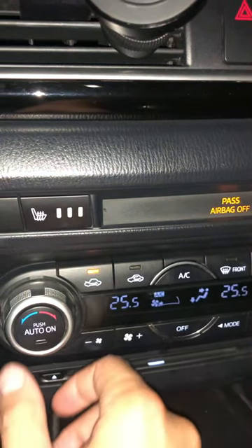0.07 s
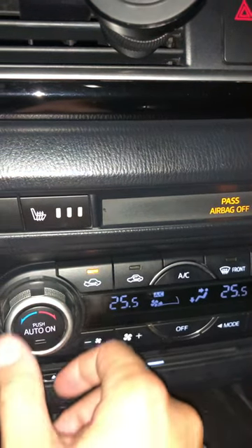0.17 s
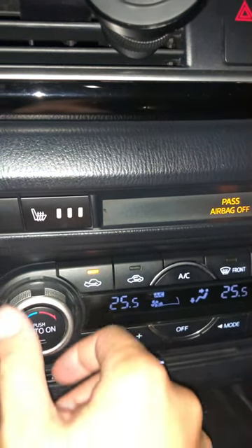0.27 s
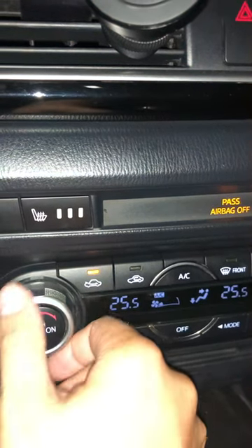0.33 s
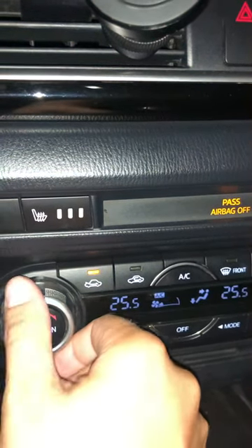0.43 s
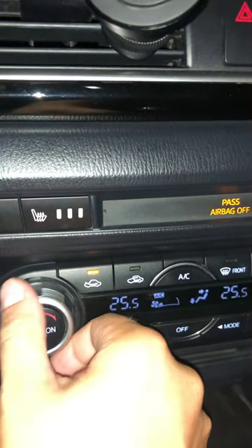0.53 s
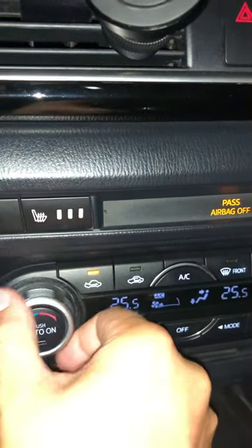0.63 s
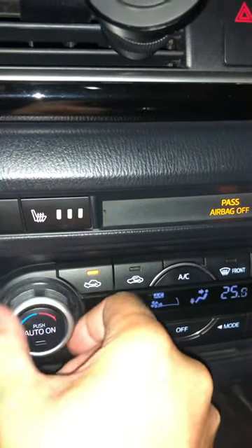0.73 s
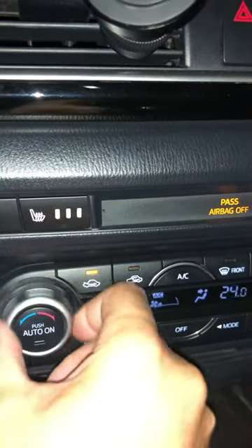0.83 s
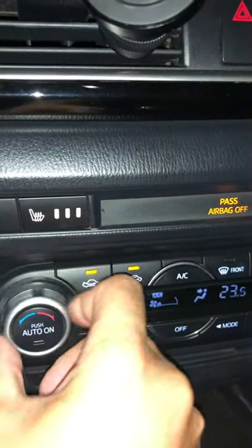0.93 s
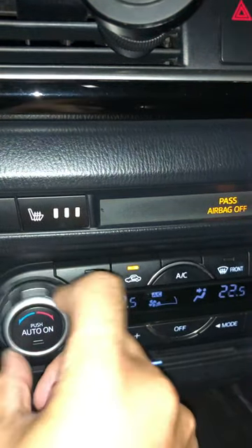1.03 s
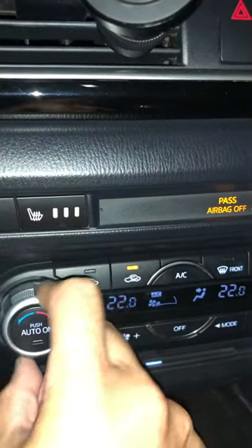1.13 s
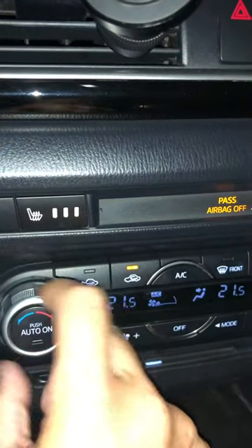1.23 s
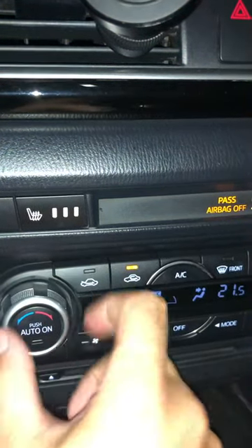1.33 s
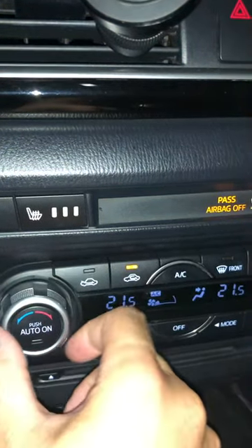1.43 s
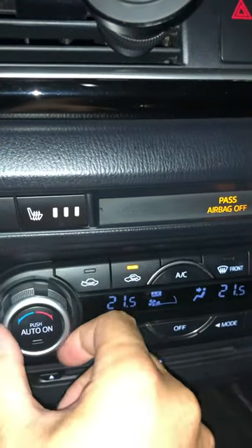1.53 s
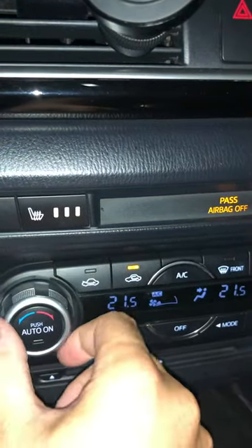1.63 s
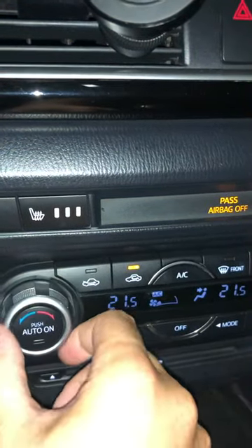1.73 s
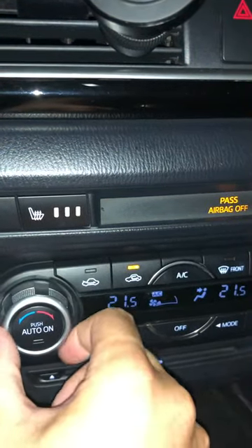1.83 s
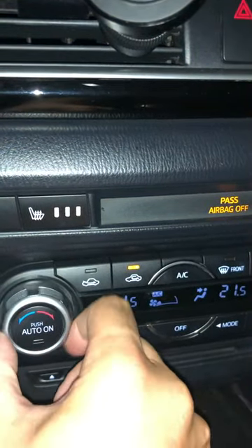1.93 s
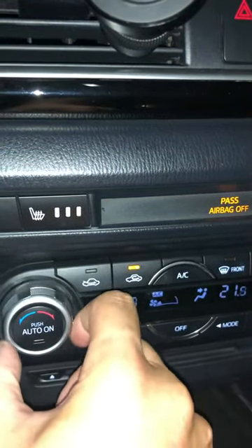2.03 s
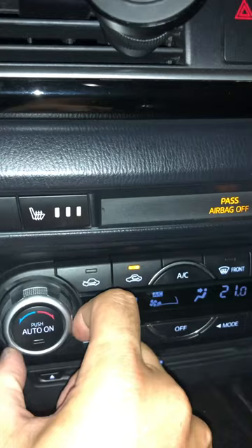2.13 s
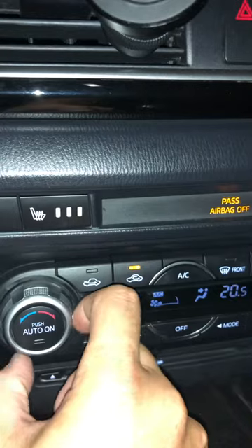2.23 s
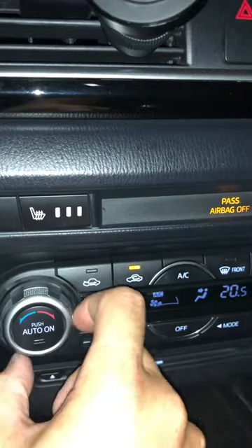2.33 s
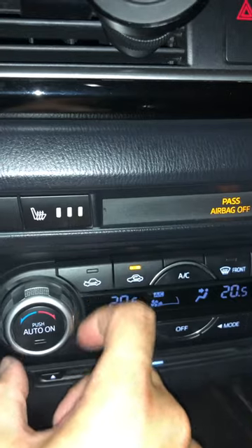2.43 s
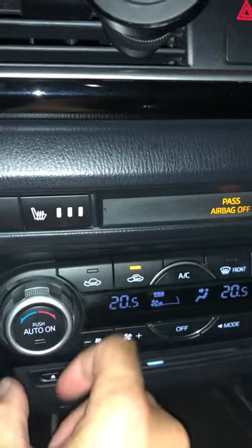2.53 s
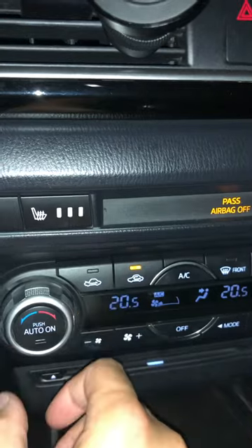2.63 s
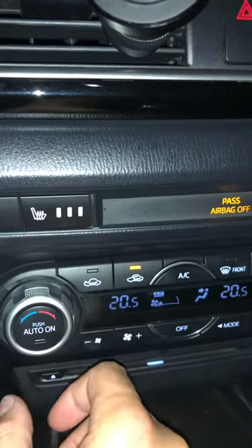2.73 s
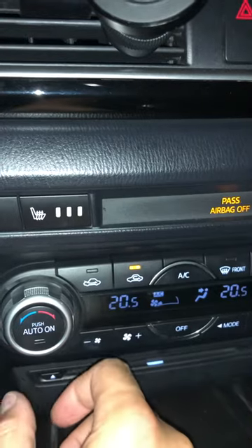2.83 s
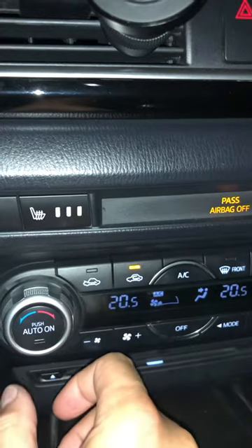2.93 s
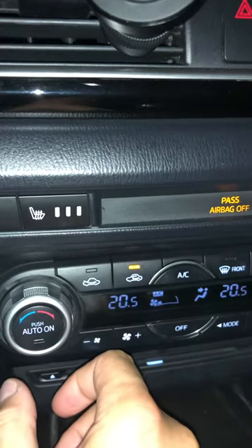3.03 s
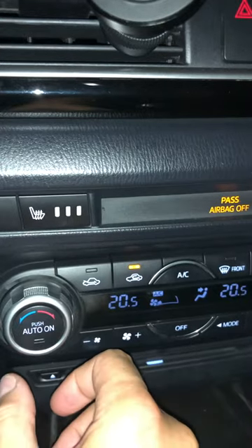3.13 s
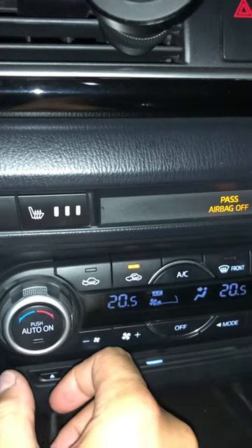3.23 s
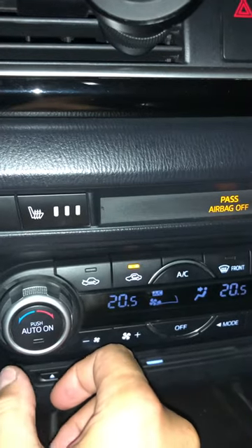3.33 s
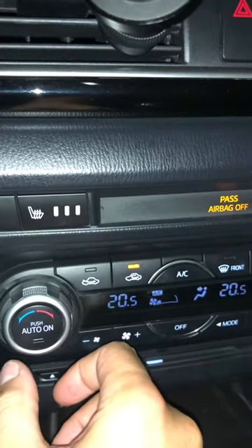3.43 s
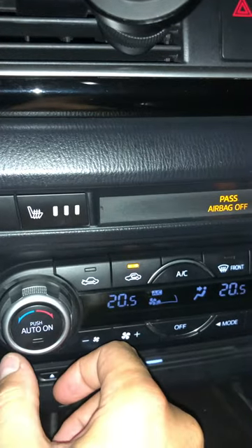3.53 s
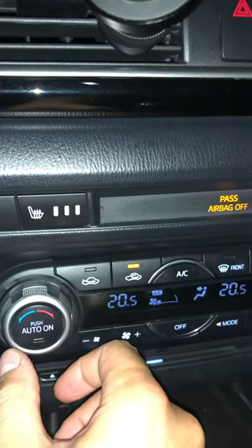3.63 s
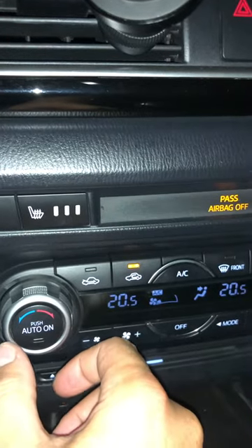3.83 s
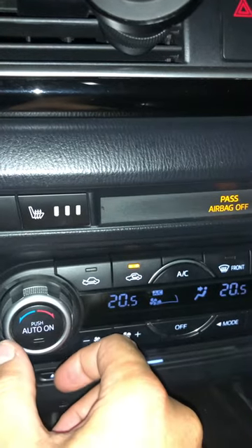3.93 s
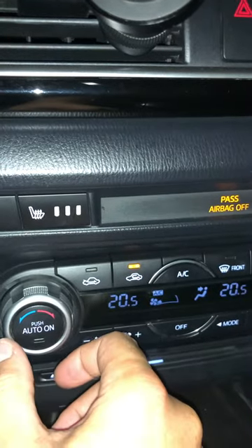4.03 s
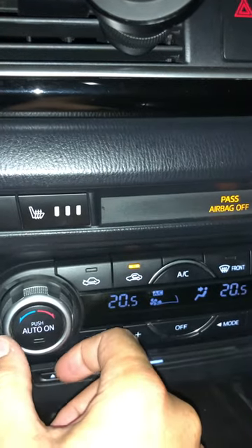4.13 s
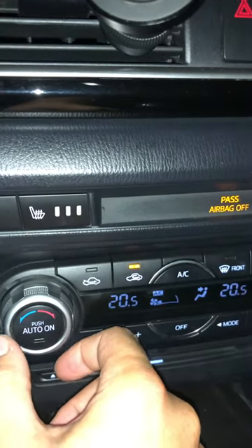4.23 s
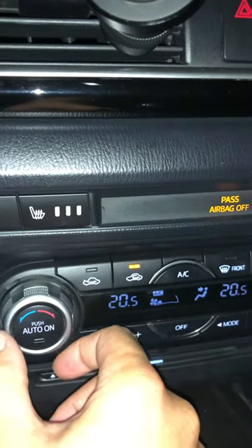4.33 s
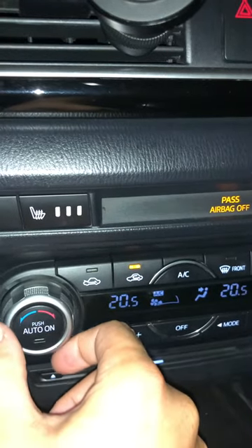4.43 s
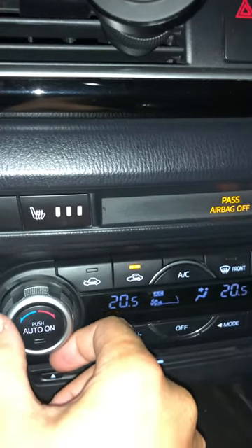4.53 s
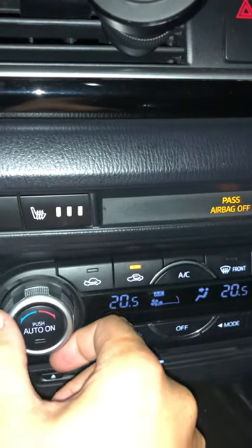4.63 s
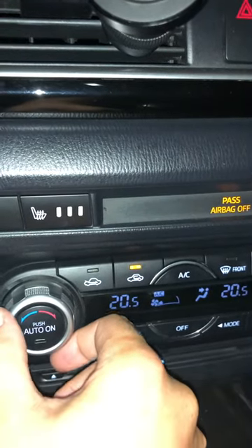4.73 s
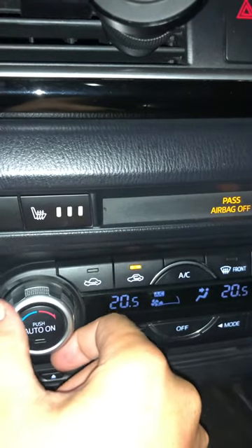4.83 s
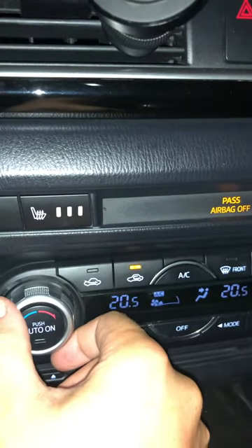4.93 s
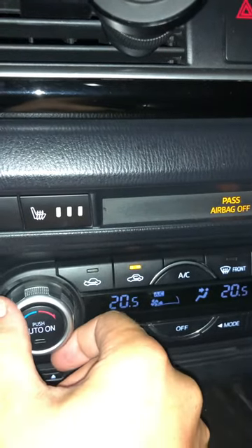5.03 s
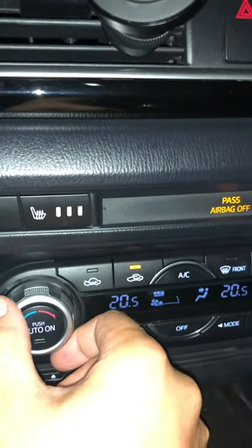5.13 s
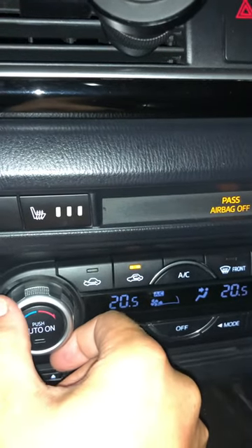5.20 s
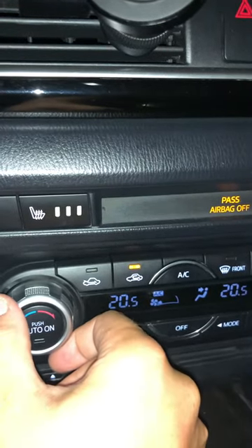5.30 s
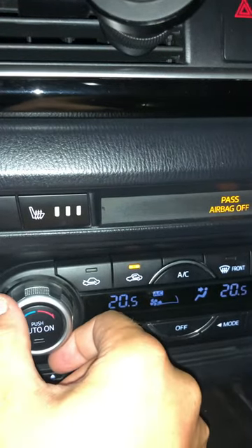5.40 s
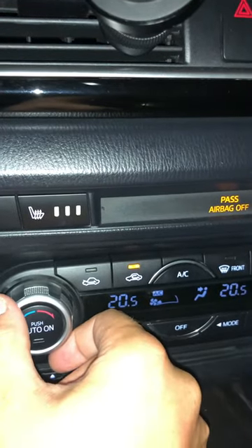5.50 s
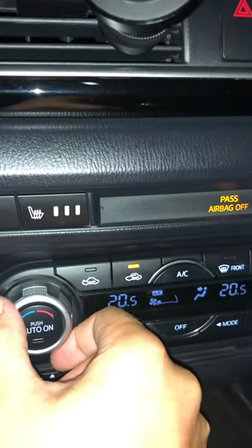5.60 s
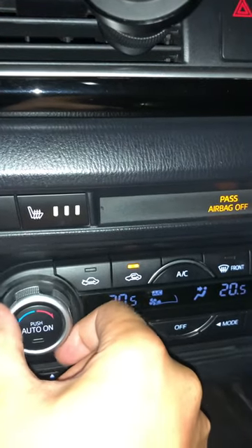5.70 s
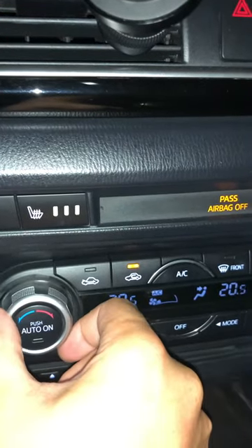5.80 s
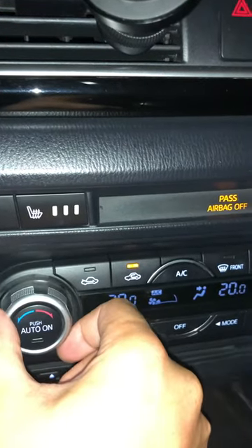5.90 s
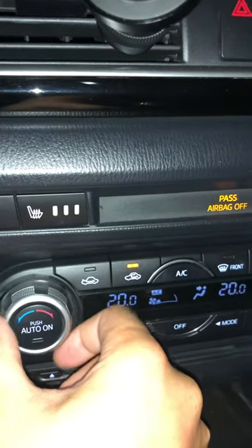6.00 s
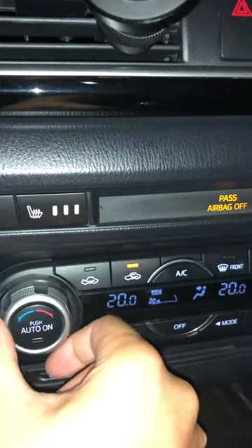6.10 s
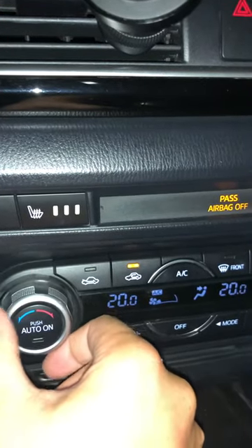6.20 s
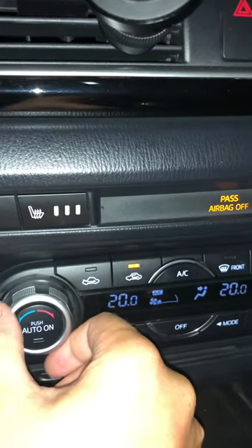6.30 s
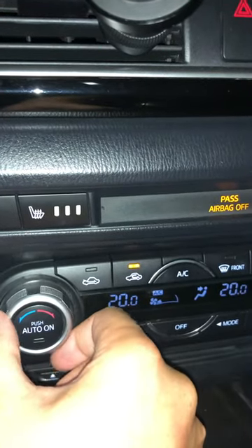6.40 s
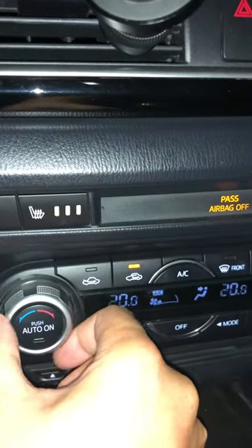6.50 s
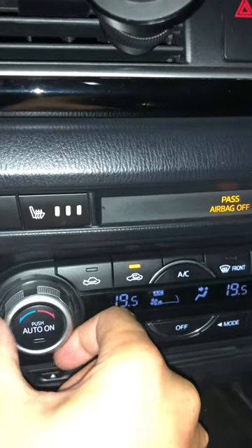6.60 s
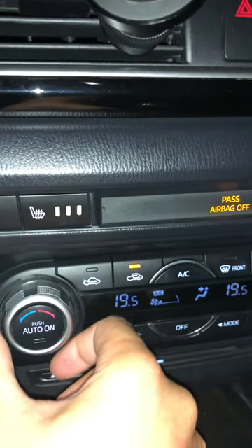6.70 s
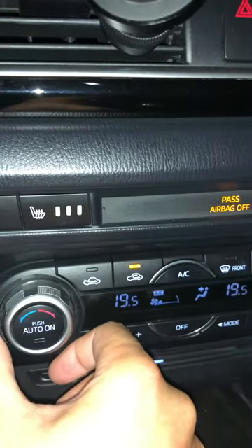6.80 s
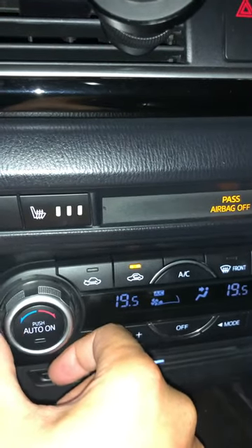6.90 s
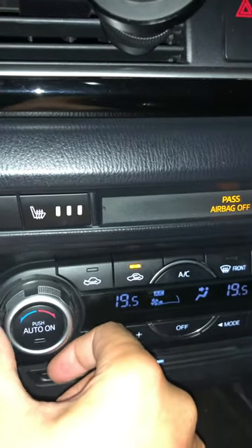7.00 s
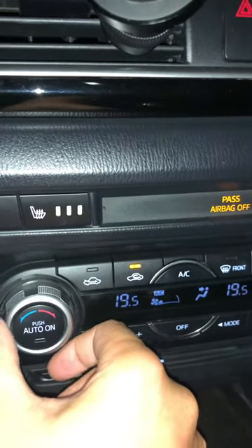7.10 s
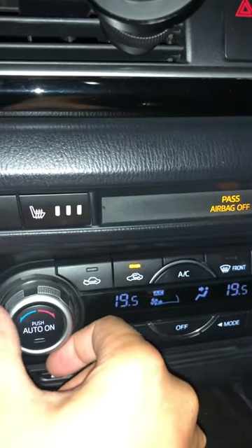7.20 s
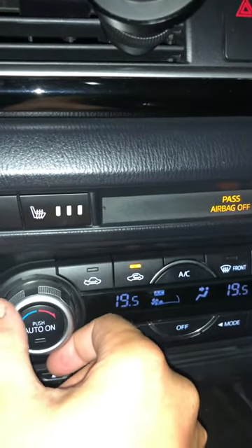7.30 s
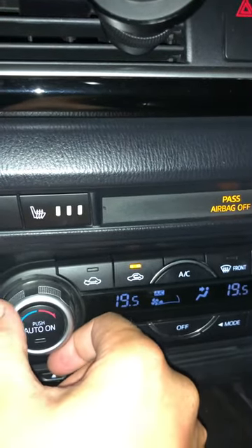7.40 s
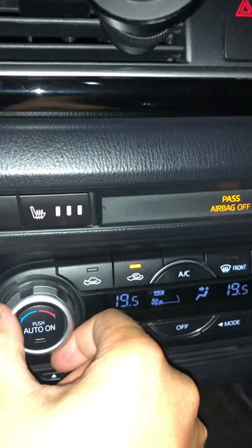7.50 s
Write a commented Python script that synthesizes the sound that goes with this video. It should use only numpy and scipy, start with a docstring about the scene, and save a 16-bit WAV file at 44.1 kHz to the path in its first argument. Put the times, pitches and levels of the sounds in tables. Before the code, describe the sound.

In the tight, dry cabin of a parked car, a low idling engine hum, steady soft blower air and bassy, gliding traffic drone run throughout, captured by a small nearby microphone. Faint dull console bumps come at 0.1 and 0.25 seconds. From about 0.55 to 1.1 seconds a knob turns through nine quick, crisp plastic clicks, roughly 0.07 seconds apart, each a bright spring tick with a short hollow panel knock; damped thuds from the hand mingle with them. Two more clicks fall at 1.95 and 2.1, with a barely audible finger brush near 2.45. Then mostly hum and air, with a very faint bump around 3.35. A light brush at 5.55 precedes a single click at 5.75; another click comes at 6.45, then a tiny brush at 6.65. Outside, the low drone swells and sinks in pitch toward the end at 7.5.

```python
"""An idling engine, a steady blower and dull traffic outside, heard inside a parked car; then a dial is turned.
The engine is a sum of shaft orders, the blower duct-coloured noise, the traffic gliding tones over rumble.
A hand bumps the console (damped thuds) and brushes the climate knob (noise puffs).
Each detent snaps a spring into a notch and rings the plastic panel; the small cabin answers at once."""
import sys
import numpy as np
from scipy import signal
from scipy.fft import rfft, irfft, next_fast_len
from scipy.io import wavfile
from scipy.ndimage import uniform_filter1d, map_coordinates

SR = 44100
rng = np.random.default_rng(int(sys.argv[2]) if len(sys.argv) > 2 else 0)


def wav_out(sig):
    """Save sig, one row per channel (or a flat mono array), as 16-bit PCM at SR to the path in sys.argv[1]."""
    wavfile.write(sys.argv[1], SR, np.round(np.clip(np.atleast_2d(sig).T, -1, 1) * 32767).astype(np.int16))


N = 332955


def amp(db):
    """Gain of a level in dB."""
    return 10 ** (np.asarray(db) / 20)


def unit(x):
    """x at rms 1."""
    return x / np.sqrt(np.mean(x ** 2) + 1e-20)


def along(points, hz):
    """Interpolate (Hz, value) points on a log frequency axis."""
    point_hz, values = np.transpose(points)
    return np.interp(np.log(hz + 1), np.log(point_hz + 1), values)


def curves(rows):
    """One value per sample for each column after the time in seconds."""
    time_s, *columns = np.transpose(rows)
    return [np.interp(np.arange(N) / SR, time_s, column) for column in columns]


def wobble(rate_hz):
    """A smooth random curve through normal knots, rate_hz of them a second."""
    knots = rng.standard_normal(int(N * rate_hz / SR) + 4)
    return map_coordinates(knots, [np.arange(N) * rate_hz / SR])


def filtered(x, response):
    """x through a zero-phase response, given as gain against Hz."""
    size = next_fast_len(len(x) + 8192)
    spectrum = rfft(x, size) * response(np.fft.rfftfreq(size, 1 / SR))
    return irfft(spectrum, size)[:len(x)]


def rush(colour_db, patchy_db):
    """Turbulence: coloured noise of rms 1 with time-frequency patches of random gain."""
    z = signal.stft(rng.standard_normal(N + 512), nperseg=512)[2]
    field = uniform_filter1d(rng.standard_normal(z.shape), size=5, axis=0)  # across frequency
    field = uniform_filter1d(field, size=12, axis=1)  # across time
    noise = signal.istft(z * amp(patchy_db * unit(field)), nperseg=512)[1][:N]
    return unit(filtered(noise, lambda hz: amp(colour_db(hz))))


def ring(modes, t, spread_db, rise_s):
    """Struck modes decay; neighbours have opposite signs, each strike new random strengths."""
    chance = rng.standard_normal(len(modes))
    total = 0
    for k, (hz, db, t60_s) in enumerate(modes):
        envelope = amp(db + spread_db * chance[k] - 60 * t / t60_s)
        total = total + (-1) ** (k + 1) * envelope * np.sin(2 * np.pi * hz * t)
    return (1 - np.exp(-t / rise_s)) * total


def engine():
    """The idling engine comes through the mounts as shaft orders that waver in strength."""
    # Each row: time in seconds, shaft turns per second, order gain in dB, fourth-order boom in dB.
    idle = [(0, 11.74, -50, -44.5), (1.5, 11.78, -55, -44.5), (2.25, 11.75, -56, -53),
            (3.75, 11.77, -53, -53), (5.25, 11.82, -55, -53), (6.4, 11.98, -63, -59),
            (7.55, 12.02, -63, -60)]
    # Each row: multiple of the shaft rate, relative level in dB.
    shaft_orders = [(2, 1), (6, 5.5), (8, -12), (10, -2), (11, -5), (12, -0.5), (22, -12.5), (24, -15.5),
                    (26, -13)]
    turns_hz, db, boom_db = curves(idle)
    angle = 2 * np.pi * np.cumsum(turns_hz * (1 + 0.0015 * wobble(2.88))) / SR
    orders = 0
    for k, level_db in shaft_orders:
        phase = rng.uniform(0, 2 * np.pi)
        orders = orders + amp(level_db + 2.5 * wobble(5)) * np.sin(k * angle + phase)
    boom = amp(boom_db + 0.53 * wobble(2.4)) * np.sin(4 * angle)
    return amp(db) * orders + boom


def blower():
    """Air rushes through the ducts, which lift a few bands."""
    # Each row: time in seconds, rms level in dB.
    air = [(0, -52), (0.9, -51), (1.4, -53), (6, -53), (7.55, -54)]
    # Noise colour. Each row: frequency in Hz, relative density in dB per Hz.
    air_colour = [(88, -33.5), (150, -13), (168, -9.5), (204, -13), (273, -7.5), (409, -13), (495, -8.5),
                  (687, -14.5), (850, -13), (1180, -20.5), (1320, -27), (1510, -26), (1950, -30.5),
                  (2180, -33), (15000, -52)]
    # Duct resonances. Each row: centre in Hz, width in Hz, boost in dB.
    ducts = [(304, 88, 2.5), (498, 68, 2), (622, 59, 2.5), (862, 21, 5.5), (1162, 47, 3), (1457, 176, 6.5)]

    def colour_db(f):
        lift_db = sum(lift * np.exp(-((f - hz) / width) ** 2) for hz, width, lift in ducts)
        return along(air_colour, f) + lift_db - 40 * (f > 15150)  # 40 dB lower above 15150 Hz

    db, = curves(air)
    return amp(db + 0.2 * wobble(8)) * rush(colour_db, patchy_db=0.96)


def traffic():
    """Firing tones of engines outside, each with a weak octave, glide over road rumble."""
    # One table per engine. Each row: time in seconds, firing rate in Hz, rms level in dB.
    drones = [
        [(0.25, 54.3, -58), (0.5, 54.5, -47), (1.2, 60.9, -47), (1.75, 60.1, -48), (2.0, 56.5, -49),
         (2.25, 52.5, -40.5), (2.75, 52.9, -47), (3.5, 56.6, -47), (3.8, 57.6, -41.5), (5.0, 62.9, -45),
         (6.25, 66.3, -44), (6.5, 64.1, -40.5), (7.0, 52.9, -39), (7.25, 49.1, -37), (7.5, 47.9, -35.5)],
        [(0, 37, -59), (3, 37.4, -58), (4.8, 37, -62), (5.4, 38, -56), (6, 43.7, -45.5), (6.5, 48.5, -46),
         (7, 49.5, -50)],
        [(0, 84.6, -49), (0.6, 84.5, -46), (1.8, 85.3, -61)],
        [(2.5, 46.9, -53), (3.2, 42.7, -53), (3.7, 44.7, -51), (4, 49.7, -56.5)],
    ]
    # Each row: time in seconds, rumble rms level in dB.
    road = [(0, -49), (0.4, -39.5), (1.1, -42.5), (2, -48), (3.5, -48.5), (4.1, -61), (4.9, -48),
            (7.55, -48)]
    # Rumble colour. Each row: frequency in Hz, relative density in dB per Hz.
    rumble = [(12, -22), (20, -9), (48, 14), (70, 0.5), (153, -4), (201, -9.5), (290, -7.5), (409, -23),
              (499, -22), (600, -22), (780, -62), (1320, -120)]
    out, t = 0, np.arange(N) / SR
    for rows in drones:
        hz, db = curves(rows)
        start_s, end_s = rows[0][0] - .1, rows[-1][0] + .1
        fade = np.clip(np.minimum(t - start_s, end_s - t) / .15, 0, 1)
        angle = 2 * np.pi * np.cumsum(hz) / SR + rng.uniform(0, 2 * np.pi)
        tone = np.sin(angle) + amp(-25.0) * np.sin(2 * angle)
        out = out + np.sqrt(2) * fade * amp(db + 1.9 * wobble(9)) * tone
    road_db, = curves(road)
    road_gain = amp(road_db + 1.6 * wobble(7))
    return out + road_gain * rush(lambda hz: along(rumble, hz), patchy_db=1.0)


def hand():
    """Light brushes are short puffs of noise; bumps are damped console thuds, brighter when harder."""
    # Console bumps. Each row: start in seconds, gain in dB, hardness as a tilt in dB per octave.
    bumps = [(0.108, -38, -1), (0.237, -40, 2), (0.602, -53, 10), (0.661, -41.5, 2), (0.74, -34.5, -9),
             (0.862, -47, 6), (.964, -34.5, 3.5), (1.011, -37.5, -4), (3.361, -47, -2)]
    # Console shell modes. Each row: frequency in Hz, level in dB before the tilt, t60 in seconds.
    console = [(180, -6.5, 0.077), (204, -0.5, 0.092), (262, -1.5, 0.16), (415, -5.5, 0.076),
               (510, -9.5, 0.1), (590, 1.5, 0.038)]
    # Fingers brush the knob. Each row: start in seconds, gain in dB, noise centre in Hz.
    touches = [(2.455, -64, 3400), (5.541, -60, 2700), (6.665, -65, 3400)]
    brush_t60_s, brush_rise_s = .055, .002
    out, t = np.zeros(N + SR), np.arange(SR // 4) / SR
    for s, db, hz in touches:
        band = lambda f: np.exp(-(np.log((f + 1) / hz) / .3) ** 2)
        puff = unit(filtered(rng.standard_normal(len(t)), band))
        envelope = amp(db - 60 * t / brush_t60_s) * (1 - np.exp(-t / brush_rise_s))
        out[round(s * SR):][:len(t)] += envelope * puff
    pivot_hz = console[1][0]
    for s, db, hard_db in bumps:
        struck = [(hz, level_db + hard_db * np.log2(hz / pivot_hz), t60_s) for hz, level_db, t60_s in console]
        out[round(s * SR):][:len(t)] += amp(db) * ring(struck, t, spread_db=2.0, rise_s=0.0047)
    return out[:N]


def cabin(x, tail_db):
    """Cabin surfaces return a short sound as first echoes and a diffuse, decaying tail."""
    # First echoes. Each row: delay in seconds, gain in dB.
    walls = [(.00112, -4.5), (.0039, -9), (.0056, -8), (.0078, -9.5), (0.0102, -8), (0.0124, -18),
             (.0165, -21), (.021, -35)]
    # Tail decay. Each row: frequency in Hz, t60 in seconds.
    tail_t60 = [(500, .1), (2000, .085), (6000, .1), (14000, .085)]
    hz, t, z = signal.stft(rng.standard_normal(len(x)), SR, nperseg=128)
    decay = amp(-60 * t / along(tail_t60, hz)[:, None])
    tail = signal.istft(z * decay, SR, nperseg=128)[1][:len(x)]
    delayed = np.pad(tail, (110, 0))[:len(x)]  # tail starts 110 samples late
    answer = amp(tail_db) * delayed / np.linalg.norm(tail)
    answer[0] += 1  # direct sound
    for s, db in walls:
        answer[round(s * SR)] += amp(db)
    return signal.fftconvolve(x, answer)[:len(x)]


def dial():
    """At each detent the spring ticks into its notch and knocks the panel; some notches rock back."""
    # Detent snaps. Each row: start in seconds, panel knock gain in dB.
    detents = [(0.5597, -38.5), (0.6514, -41), (0.7142, -39), (0.776, -41), (0.8525, -38.5),
               (0.9155, -40.5), (0.9713, -40.5), (1.0353, -42), (1.1012, -41), (1.9597, -39), (2.1063, -39),
               (5.7711, -40.5), (6.4492, -40)]
    # Knob rocks back in its notch. Each row: start in seconds, gain in dB.
    rebounds = [(.6568, -41), (.7205, -46), (.9745, -46)]
    # Spring and notch modes. Each row: frequency in Hz, level in dB, t60 in seconds.
    spring = [(3674, 6, 0.0057), (4580, -4.5, 0.01), (5140, -0.5, 0.005), (6050, 1, 0.0091),
              (6960, -2.5, 0.012), (8100, -4, 0.0074), (9030, -3.5, 0.0075), (9900, -9, 0.0085),
              (10600, -2, 0.0055), (12340, -4.5, 0.0062), (13300, -9, .007), (14700, -20, .004)]
    # Knob and panel modes for a knock. Each row: frequency in Hz, level in dB, t60 in seconds.
    panel = [(910, 4.5, 0.011), (1165, -3.5, 0.017), (1513, -2.5, 0.017), (1780, -0.5, 0.0062),
             (2097, -6, 0.015), (2660, -12.5, 0.01)]
    tick_db = -57.5  # one gain: the spring always falls from the same height
    rebound_speed = 1.1  # raises the panel's pitch and shortens its rise and decay
    out, t = np.zeros(N + SR), np.arange(SR // 6) / SR
    for s, db in detents:
        tick = ring(spring, t, spread_db=2.6, rise_s=0.00012)
        tick[:2] += np.array([1, -1])  # the bare contact is broadband
        knock = ring(panel, t, spread_db=0.5, rise_s=0.00018)
        tick, knock = cabin(tick, tail_db=2.5), cabin(knock, tail_db=-3.5)
        out[round(s * SR):][:len(t)] += amp(tick_db) * tick + amp(db) * knock
    for s, db in rebounds:
        rock = ring(panel, rebound_speed * t, spread_db=2.5, rise_s=0.00037)
        out[round(s * SR):][:len(t)] += amp(db) * cabin(rock, tail_db=-4)
    return out[:N]


def scene():
    """All sources at one microphone."""
    return (engine() + blower() + traffic() + hand() + dial())[None]


def record(dry):
    """The small microphone loses the deepest bass; nothing is kept above the band limit."""
    bass_hz, top_hz = 36, 15750
    edge = SR // 10
    longer = np.pad(dry[0], edge, "reflect", reflect_type="odd")  # the sound runs on past both ends

    def response(hz):
        return (hz < top_hz) * hz ** 4 / np.hypot(hz ** 4, bass_hz ** 4)

    return filtered(longer, response)[None, edge:-edge]


dry = scene()
out = record(dry)
wav_out(out)
```